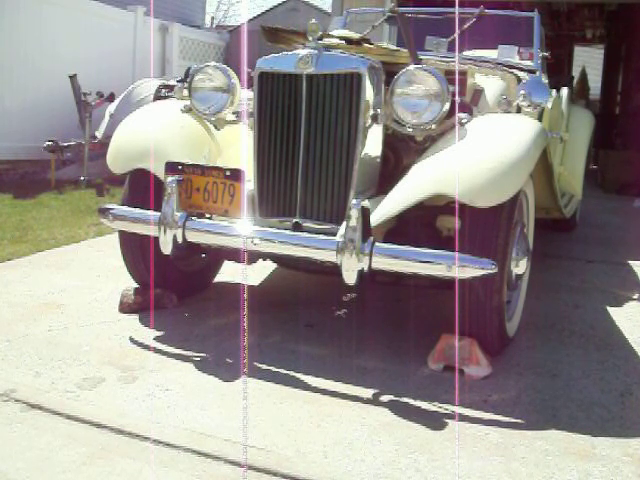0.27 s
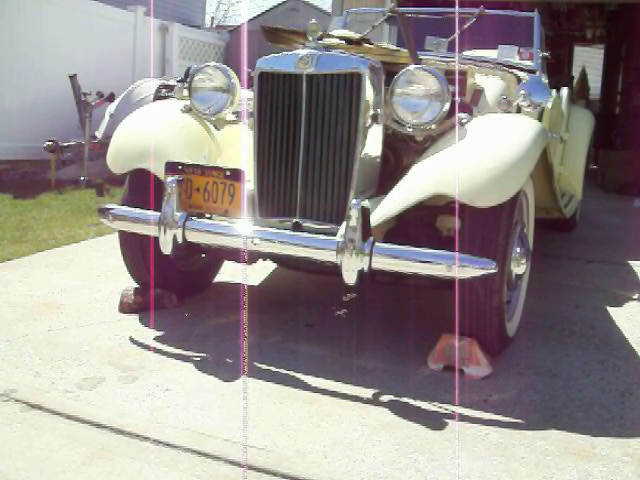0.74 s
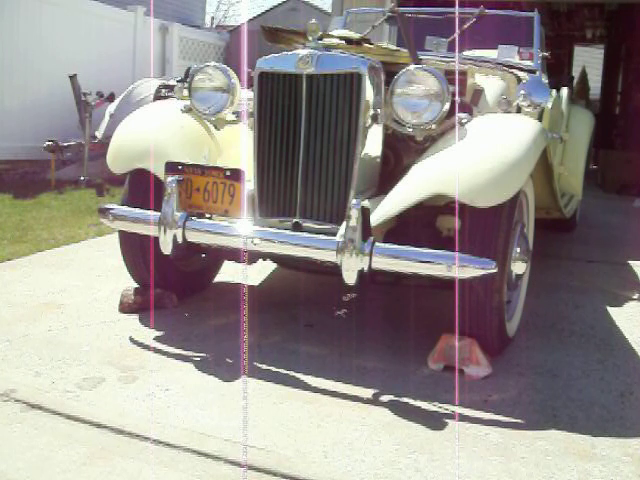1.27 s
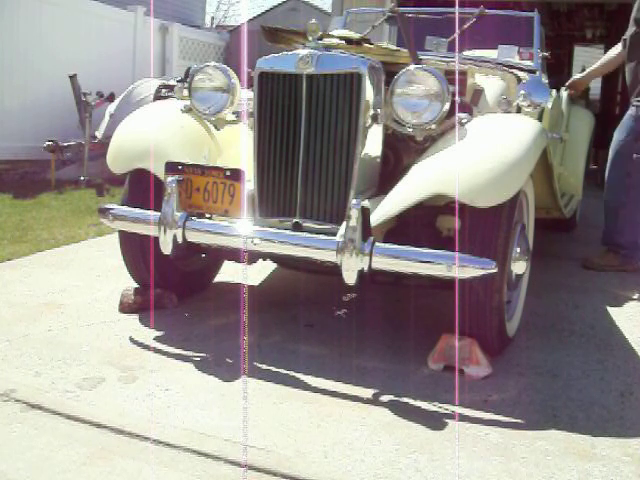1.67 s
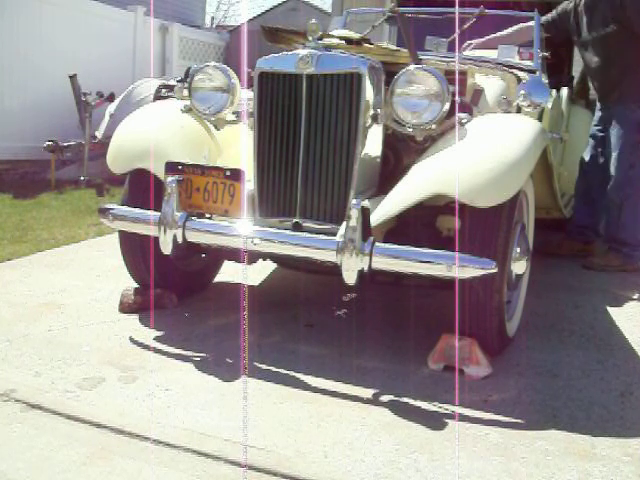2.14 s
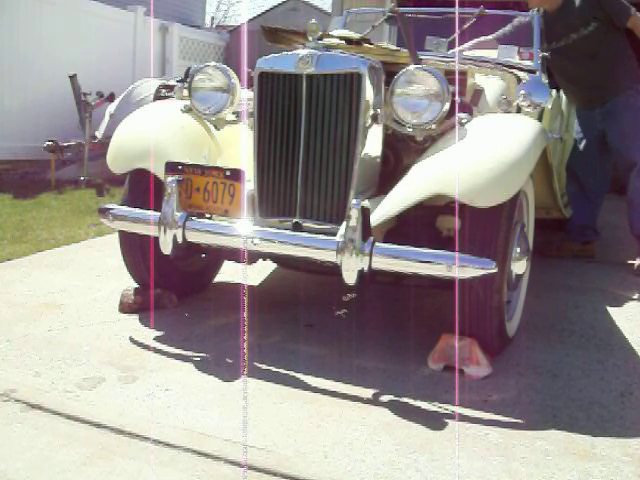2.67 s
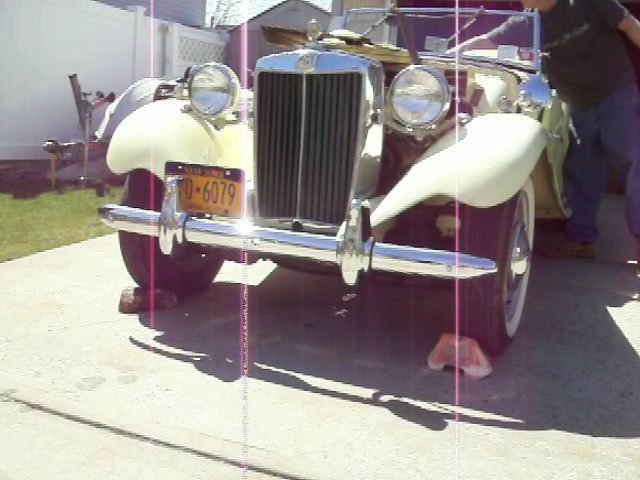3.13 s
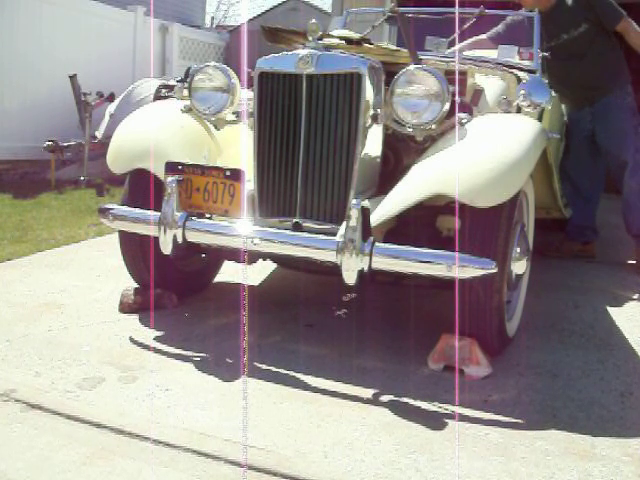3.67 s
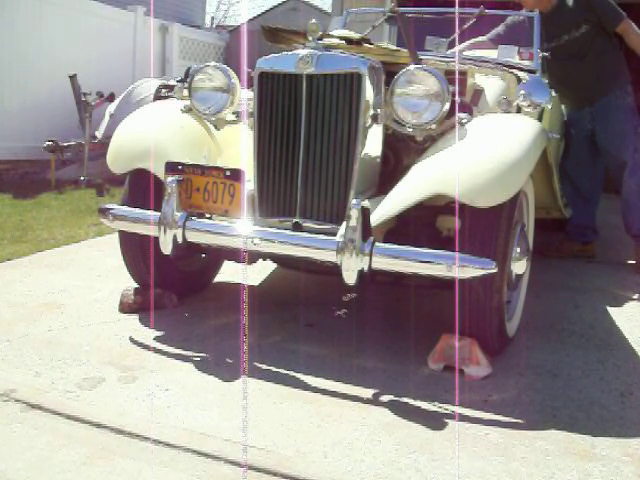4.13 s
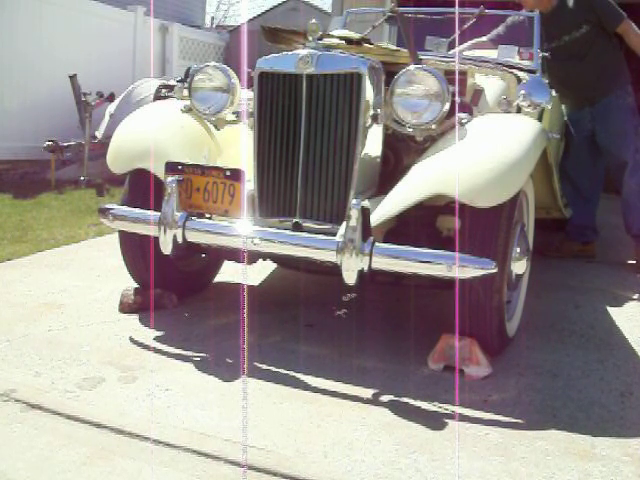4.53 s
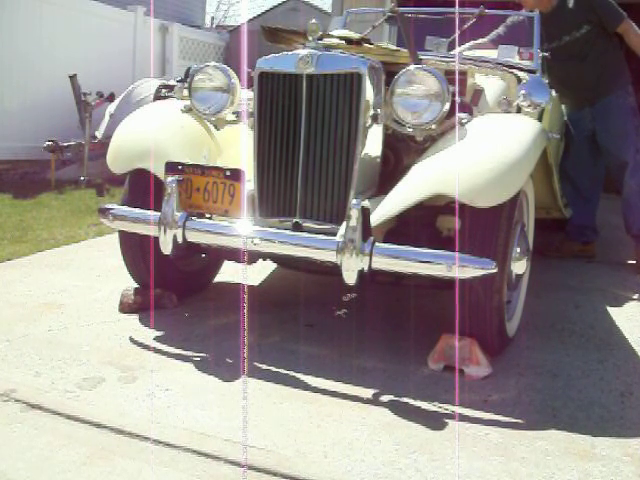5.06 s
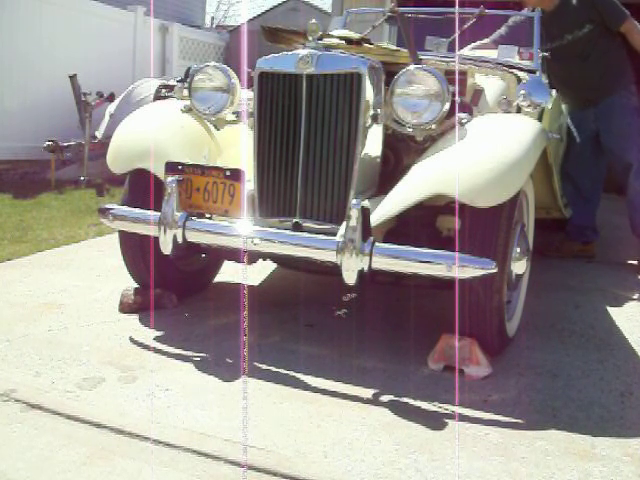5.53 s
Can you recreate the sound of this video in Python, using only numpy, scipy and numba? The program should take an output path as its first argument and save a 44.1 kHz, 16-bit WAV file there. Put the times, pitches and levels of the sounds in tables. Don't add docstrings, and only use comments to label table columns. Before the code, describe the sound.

An old car engine idles steadily a few metres away on a driveway, low exhaust burble under rattling valve clatter. Wind rumbles on the bare microphone, with violent buffets and a distorted crack around the middle. At three seconds the ignition is cut; the note dulls and slows into separate puffs, ticks and knocks, then stops. A far bird whistles over soft suburban hum.

```python
import sys
import numpy as np
from scipy import signal
from scipy.fft import rfft, irfft
from scipy.io import wavfile
from scipy.ndimage import uniform_filter1d
from numba import njit

SR = 44100
rng = np.random.default_rng(int(sys.argv[2]) if len(sys.argv) > 2 else 0)


def unload_audio(sound):
    columns = np.transpose(np.atleast_2d(sound))
    steps = np.round(np.clip(columns, -1, 1) * 32767)
    wavfile.write(sys.argv[1], SR, steps.astype(np.int16))


def gain_from_db(level_db):
    decades = np.asarray(level_db, float) / 20
    return 10 ** decades


N = 255780
T = np.arange(N) / SR


def level(x, db):
    return x * gain_from_db(db) / np.sqrt(np.mean(x ** 2))


@njit
def svf(x, hz, width):
    y, band, low = np.empty(len(x)), 0., 0.
    g, k = np.tan(np.pi * hz / SR), width / hz
    for i in range(len(x)):
        v = (band + g * (x[i] - low)) / (1 + g * (g + k))
        band, low, y[i] = 2 * v - band, low + 2 * g * v, k * v
    return y


@njit
def follow(x, attack, release):
    y, e = np.empty(len(x)), 0.
    for i in range(len(x)):
        e += (abs(x[i]) - e) * (attack if abs(x[i]) > e else release)
        y[i] = e
    return y


def ring(x, modes):
    out = np.zeros(len(x))
    for k, (hz, width, db) in enumerate(modes):
        out += (-1) ** k * gain_from_db(db) * svf(x, 1. * hz, 1. * width) / width
    return out


def colour(points):
    hz, db = np.transpose(points)
    f = np.maximum(np.fft.rfftfreq(N, 1 / SR), 1)
    gain = gain_from_db(np.interp(np.log(f), np.log(hz), db))
    return level(irfft(rfft(rng.standard_normal(N)) * gain, N), 0)


def walk(rate):
    k = int(SR / rate)
    held = np.repeat(rng.standard_normal(N // k + 1), k)
    return 1.5 * uniform_filter1d(uniform_filter1d(held, k), k)[:N]


def beats(stroke, every=1):
    return np.diff(np.floor(stroke / every), prepend=np.floor(stroke[0] / every))


# frequency_hz, level_db_per_hz
SUBURB = [(88, -37), (150, -6.5), (375, -14.5), (964, -9.5), (1110, -11.5), (1190, -15), (1620, -18.5),
          (2410, -20.5), (4570, -21.5), (5740, -32.5), (7460, -63.5), (12600, -120)]


def suburb():
    return colour(SUBURB) * gain_from_db(-44.5 + .5 * walk(4.7))


# start_s, length_s, start_hz, end_hz, level_db
BIRD = [(3.33, .13, 1750, 2050, -47), (3.69, .13, 1750, 2080, -45), (3.885, .04, 4900, 4200, -45),
        (4.05, .12, 1680, 2050, -48), (4.238, .03, 4950, 4100, -42), (4.42, .07, 1750, 1900, -51),
        (4.605, .035, 4950, 4000, -47), (4.752, .06, 2080, 1700, -53), (5.06, .02, 4400, 4100, -57),
        (5.12, .07, 2000, 1700, -55), (5.395, .03, 3100, 2700, -57), (5.5, .05, 1950, 1700, -54)]


def bird():
    out = np.zeros(N)
    waver = walk(150)
    for s, length, hz0, hz1, db in BIRD:
        u = np.clip((T - s) / length, 0, 1)
        swell = gain_from_db(db + 1.5 + 3.5 * waver) * np.sqrt(4 * u * (1 - u))
        pitch_hz = hz0 + (hz1 - hz0) * u ** .6
        out += swell * np.sin(2 * np.pi * np.cumsum(pitch_hz) / SR)
    return out


# time_s, level_db
BREEZE = [
    (0, -28),
    (.7, -19.5),
    (1.3, -24),
    (2, -27.5),
    (3, -20.5),
    (3.2, -30),
    (3.9, -26.5),
    (4.6, -27),
    (5, -26.5),
    (5.8, -35.5),
]
# centre_s, half_length_s, rumble_db, flutter_db
GUSTS = [(0, .04, -14.5, -32), (0.111, .025, -16, -35), (0.453, 0.1, -17.5, -33.5), (1.55, 0.076, -21, -38),
         (1.883, .04, -23, -45), (2.02, 0.019, -25, -14.5), (2.093, .04, -10, -23.5),
         (2.3, 0.079, -4.5, -10), (2.483, 0.058, -19, -16), (2.549, 0.048, -9, -47),
         (2.845, 0.035, -15, -21), (3.026, 0.059, -15, -39), (4.029, 0.079, -18, -44),
         (4.184, 0.12, -26.5, -34), (4.36, 0.075, -17, -41), (4.67, 0.023, -27, -52),
         (4.812, 0.066, -23, -28), (5.028, 0.027, -21.5, -38), (5.39, .05, -23, -60),
         (5.593, 0.091, -26.5, -56)]


def wind():
    rumble = colour([(10, -32), (22, -4), (40, 5.5), (75, -2), (140, -13.0), (300, -38), (2000, -96.5)])
    flutter = colour([(50, -15.0), (110, 2.0), (220, -10.5), (350, -16.5), (700, -24.0), (3000, -91)])
    breeze = gain_from_db(np.interp(T, *np.transpose(BREEZE)) + 3.5 * walk(13))
    low_gusts, high_gusts = np.zeros(N), np.zeros(N)
    for s, half, rumble_db, flutter_db in GUSTS:
        shape = np.exp(-((T - s) / half) ** 2)
        low_gusts += gain_from_db(rumble_db) * shape
        high_gusts += gain_from_db(flutter_db) * shape
    low = np.maximum(breeze, low_gusts)
    high = breeze * gain_from_db(-17) + high_gusts
    return rumble * low + flutter * high * gain_from_db(0.57 * walk(40))


def blips(table, ms):
    push = np.zeros(N)
    for s, db in table:
        width_ms = ms * gain_from_db(-.25 * db)
        push += gain_from_db(db) * np.exp(-.5 * ((T - s) * 1000 / width_ms) ** 2)
    return signal.sosfilt(signal.butter(2, 35, "high", fs=SR, output="sos"), push)


# time_s, peak_db
PUSHES = [
    (0.491, -5.5),
    (2.031, -17),
    (2.275, 8),
    (2.287, -2),
    (2.32, 0),
    (2.383, 7),
    (2.465, -4),
    (2.876, -1.5),
    (5.156, -13.5),
]
# time_s, peak_db
SUCKS = [(0.684, -3.5), (2.224, 2), (2.258, -16), (2.278, -12), (2.313, 6.5), (2.339, -3), (2.361, -15),
         (2.377, 4.5), (2.431, -14), (2.46, 5), (2.511, -4.5), (4.002, -8), (4.048, -7.5), (4.322, -6.5),
         (4.337, -11.5), (4.766, -12.5), (4.784, -17), (4.804, -3.5), (4.823, -9.5), (5.014, -14.5),
         (5.409, -16.5)]
# time_s, peak_db
SLAM = [
    (2.5482, 3),
]


def buffets():
    return blips(PUSHES, .93) - blips(SUCKS, .84) + blips(SLAM, 1.1)


# time_s, stroke_rate_hz, exhaust_db
IDLE = [
    (0, 40.84, -15),
    (0.302, 40.97, -16),
    (0.698, 41.29, -16.5),
    (1.3, 41.64, -16.5),
    (1.7, 40.89, -16),
    (2.1, 40.72, -17.5),
    (2.5, 41.21, -16.5),
    (2.96, 41.32, -18),
]
COAST_S, FRICTION_HZ_PER_S, DRAG_PER_S, ROCKING_HZ = 2.99, 15., .4, .9
CHOKE_HZ, CHOKE_STEEP = 22.6, 4.0


def crank():
    s, hz, db = np.transpose(IDLE)
    rest = FRICTION_HZ_PER_S / DRAG_PER_S
    decay = np.exp(-DRAG_PER_S * np.maximum(T - COAST_S, 0))
    hz = np.maximum((np.interp(T, s, hz) + rest) * decay - rest, ROCKING_HZ)
    choke_db = 10 * np.log10(1 + (CHOKE_HZ / hz) ** (2 * CHOKE_STEEP))
    return hz, np.interp(T, s, db) - choke_db


# peak_s, level_db
SIGHS = [(3.6, -32), (3.85, -35), (4.118, -26), (4.192, -28.5), (4.27, -29), (4.33, -28), (4.392, -31),
         (4.446, -32), (4.52, -28), (4.8, -40.5), (4.92, -35.5), (5.05, -36), (5.32, -43)]
SIGH_RISE_S, SIGH_FADE_DB_PER_S = .006, 150


def sigh():
    rush = colour([(150, -19), (320, -5), (500, -3), (1000, -5.5), (1500, -12.0), (4000, -34)])
    puffs = np.zeros(N)
    for s, db in SIGHS:
        rise = np.clip((T - s) / SIGH_RISE_S + 1, 0, 1)
        puffs += rise * gain_from_db(db - SIGH_FADE_DB_PER_S * np.maximum(T - s, 0))
    return rush * puffs * gain_from_db(-7 + 0.42 * walk(50))


def contacts(table, crack_db, spread):
    out = np.zeros(N)
    t = T[:SR // 8]
    for s, db, hz, t60 in table:
        i = int(s * SR)
        air = rng.standard_normal(len(t))
        puff = svf(svf(air, 1. * hz, spread * hz), 1. * hz, spread * hz)
        tone = np.sin(2 * np.pi * hz * t) / 2
        envelope = gain_from_db(db - 60 * t / t60) * (1 - np.exp(-t / 0.00085))
        out[i:i + len(t)] += envelope * (tone + level(puff, crack_db))
    return out


# start_s, peak_db, ring_hz, t60_s
KNOCKS = [(3.686, -21, 698.2, 0.069), (3.896, -21.5, 1300, 0.088), (4.112, -30.5, 476, 0.08),
          (4.131, -36, 468, 0.049), (4.175, -24, 1322, 0.096), (4.189, -27, 560, 0.08),
          (4.209, -38, 530, 0.089), (4.299, -30, 673, 0.08), (4.355, -18, 706, 0.039),
          (4.389, -23, 774, 0.037), (4.447, -14.5, 697, 0.025), (4.489, -36, 764, 0.072),
          (4.519, -23, 490, 0.077), (4.55, -33.5, 3580, 0.17), (4.692, -28.5, 3420, 0.05),
          (4.9, -24, 458, 0.067)]


def knocks():
    return contacts(KNOCKS, crack_db=-9.0, spread=0.32)


SEAT_FROM_S, SEAT_TO_S, SEAT_LAG = 3.36, 4.0, 0.42
SEAT_DB, SEAT_SCATTER_DB, SEAT_HZ, SEAT_SPREAD = -26.5, 5, 3201, .08


def seat_rows(stroke):
    times = T[(beats(stroke - SEAT_LAG) > 0) & (T > SEAT_FROM_S) & (T < SEAT_TO_S)]
    chance = rng.standard_normal((40, 2))
    return [(s, SEAT_DB + SEAT_SCATTER_DB * a, SEAT_HZ * (1 + SEAT_SPREAD * b))
            for s, (a, b) in zip(times, chance)]


# start_s, peak_db, ring_hz
TICKS = [(4.0282, -22, 3020), (4.061, -36, 3020), (4.1679, -20.5, 2680), (4.199, -26, 2650),
         (4.235, -27, 2920), (4.2994, -25, 2200), (4.3444, -21, 3500), (4.403, -23.5, 3510),
         (4.4194, -25, 2770), (4.469, -22.5, 2680), (4.5482, -27.5, 3500), (4.6935, -33, 3370)]


def valve_ticks(stroke):
    t60_s = 0.046
    metal = [(*row, t60_s) for row in [*TICKS, *seat_rows(stroke)]]
    return contacts(metal, crack_db=-5, spread=0.67) * gain_from_db(-5)


TAPPET_DB = [0.5, 1.5, -0.5, 2.5]
# frequency_hz, level_db_per_hz
CLATTER = [(180, -38), (300, -15.5), (327, -10), (457, -11), (614, -5), (1150, -8.5), (1320, -15.5),
           (1590, -15), (3380, -10), (5140, -15.5), (5740, -26), (7460, -52), (12600, -120)]
# frequency_hz, width_hz, level_db
BLOCK = [(1300, 39.5, -6), (2410, 350, 8), (2917, 180, 3), (3386, 77, 0.5), (4284, 190, -4.5)]
CLATTER_LAG, CLANK_LAG = .43, .4
CLATTER_DB, CLATTER_LAW = -28, 1.137
SHUDDER_S, SHUDDER_HALF_S, SHUDDER_DB = 4.43, 0.16, 3


def valvegear(stroke, hz):
    speed = hz / hz.max()
    late = stroke - CLATTER_LAG + 4
    count = late.astype(int)
    size = gain_from_db(np.array(TAPPET_DB)[count % 4] + 2.2 * rng.standard_normal(200)[count])
    depth = .56 * speed ** 0.42
    burst = 1 - depth + depth * size * np.sin(np.pi * (late % 1) ** 0.64) ** 1.4
    rattle = burst * colour(CLATTER) * gain_from_db(walk(60))
    block = ring(burst * rng.standard_normal(N), BLOCK)
    seats = np.zeros(N)
    for k, (a, w) in enumerate(rng.random((12, 2))):
        angle = k // 3 + .25 + 0.22 * (k % 3) - .12 * (a - .5)
        seats += gain_from_db(5.3 * w) * beats(late - angle, every=5.3)
    seats = ring(seats * gain_from_db(walk(200)), [*BLOCK[1:], (3500, 2400, 80)])
    clank = svf(beats(stroke - CLANK_LAG, every=4), 1300., 40.)
    total = level(rattle, 0) + level(block, -3.5) + level(seats, -11.5) + level(clank, -17.5)
    shudder_db = SHUDDER_DB * np.exp(-((T - SHUDDER_S) / SHUDDER_HALF_S) ** 2)
    return total * gain_from_db(CLATTER_DB + shudder_db) * speed ** CLATTER_LAW


SPREAD, CENTRE_ORDER = .05, 7


def note(turn, orders, unsteady_db, fade):
    out = np.zeros(N)
    for k, db in orders:
        phase = 2 * np.pi * (k * turn - SPREAD * (k - CENTRE_ORDER) ** 2)
        out += fade(k) * gain_from_db(db + unsteady_db * walk(14)) * np.cos(phase)
    return out


CYLINDER_DB = [3.6, 3, 5.5, -5]
# frequency_hz, width_hz, level_db
PIPE = [(506.4, 8.7, -3.5), (619, 19, 0.5), (808, 9.8, -3.5)]
# multiple_of_crank_turns, level_db
FIRING = [(1, -14), (2, -7.5), (3, -15.5), (4, -8), (5, -25.5), (6, 1), (7, -28.5), (8, -5), (9, -13.5),
          (10, -8.5), (11, -27.5), (12, -31.5), (13, -41.5), (14, -30.5), (15, -33.5), (16, -17.5),
          (17, -32), (18, -27), (19, -23.5), (20, -28), (21, -29.5)]
# multiple_of_crank_turns, level_db
PUMPING = [(2, -1), (3, -14), (4, 1), (5, -16), (6, -11), (8, -16), (10, -15), (12, -21)]
CUT_S, COOL_S = 3.045, 0.2
PUMP_FAILS_HZ = 23.
BOX_HZ, BOX_WIDTH_HZ, BOX_IDLE_DB, BOX_SWELL_DB = 225., 7.8, -21.5, 4
BOX_FROM_S, BOX_TO_S, BOX_EDGE_S = 2.6, 3.47, 0.037


def exhaust(stroke):
    count = stroke.astype(int)
    size = gain_from_db(np.array(CYLINDER_DB)[count % 4] + 4.0 * rng.standard_normal(200)[count])
    kicks = beats(stroke) * size
    since = np.maximum(T - CUT_S, 0) / COOL_S
    fired = note(stroke / 2, FIRING, 1.0, lambda k: np.exp(-(since * max(k / 6, 1) ** 3) ** 2))
    pumped = note(stroke / 2, PUMPING, 4.0, lambda k: 1 - np.exp(-since ** 2 * 2))
    pumped /= 1 + (PUMP_FAILS_HZ / (np.gradient(stroke) * SR)) ** 10
    swell = (np.tanh((T - BOX_FROM_S) / BOX_EDGE_S) - np.tanh((T - BOX_TO_S) / BOX_EDGE_S)) / 2
    box = svf(svf(kicks, BOX_HZ, BOX_WIDTH_HZ), BOX_HZ, 2 * BOX_HZ)
    box = level(box, 0) * gain_from_db(BOX_IDLE_DB + BOX_SWELL_DB * swell)
    bark = svf(svf(kicks * (count % 4 == 0), 165., 90.), 190., 160.0)
    bark = level(bark, -13) * np.exp(-since)
    thud = svf(svf(kicks, 125., 41.0), 125., 64.0)
    thud = level(thud, -10) * np.minimum(since ** 2 / 3, 1.5)
    pipe = level(ring(kicks, PIPE), -24.0) * np.exp(-since)
    return fired + pumped + box + bark + thud + pipe


BARK_FIRING_S = 1.4745


def scene():
    hz, exhaust_db = crank()
    stroke = np.cumsum(hz) / SR
    stroke += 64 - stroke[int(BARK_FIRING_S * SR)]
    background = suburb() + bird()
    air = wind() + buffets()
    stopping = sigh() + knocks() + valve_ticks(stroke)
    engine = valvegear(stroke, hz) + exhaust(stroke) * gain_from_db(exhaust_db)
    return (background + air + stopping + engine)[None]


def roll_off(x):
    return signal.sosfilt(signal.butter(12, 16500, fs=SR, output="sos"), x)


# time_s, depth_db
DUCKS = [
    (2.225, -8.5),
    (2.286, -11),
    (2.318, -7.5),
    (2.365, -9),
    (2.387, -3.5),
    (2.468, -3),
    (2.512, -8),
    (2.5496, -10),
]
FLIPS_S = [
    2.54808,
    2.54846,
]
LIMIT_DB, LIMIT_RATIO, ATTACK_S, RELEASE_S, RECOVER_S = -15, 1.36, 0.0023, 0.0099, 0.025
TOP_HZ, FULL_SCALE = 5590, .73


def record(dry):
    peak = follow(dry[0], 1 / (ATTACK_S * SR), 1 / (RELEASE_S * SR))
    x = dry[0] * np.minimum(1, gain_from_db(LIMIT_DB) / (peak + 1e-9)) ** (1 - 1 / LIMIT_RATIO)
    duck_db = sum(db * (T > s) * np.exp(-np.abs(T - s) ** 2 / RECOVER_S ** 2) for s, db in DUCKS)
    x = x * gain_from_db(uniform_filter1d(duck_db, size=100))
    x = .66 * np.tanh(x / .66 + (x / .66) ** 3 / 4)
    x = signal.sosfiltfilt(signal.cheby2(10, 50, TOP_HZ * 1.2305, fs=SR, output="sos"), x)
    flips = sum(np.sinc((T - s) * 11500) * np.exp(-((T - s) / .0008) ** 2) for s in FLIPS_S)
    plateau = .12 * np.exp(-((T - np.mean(FLIPS_S)) / .0005) ** 2)
    x = np.clip(x - 1.4 * flips + plateau, -FULL_SCALE, FULL_SCALE)
    return roll_off(x[None])


dry = scene()
out = record(dry)
unload_audio(out)
```